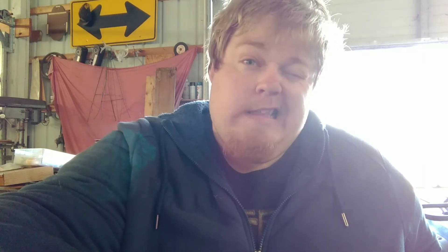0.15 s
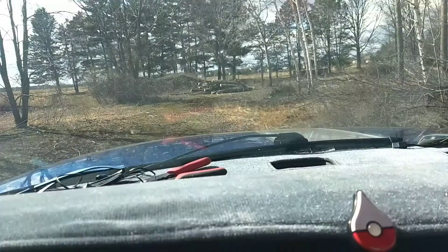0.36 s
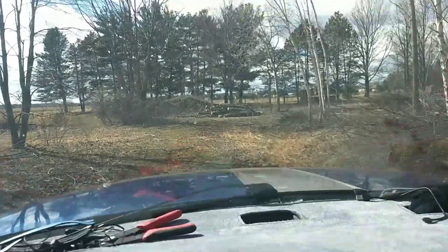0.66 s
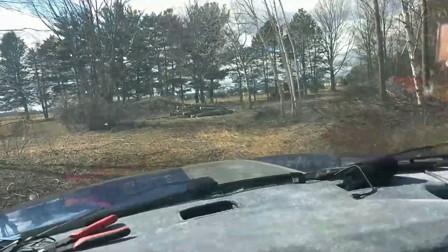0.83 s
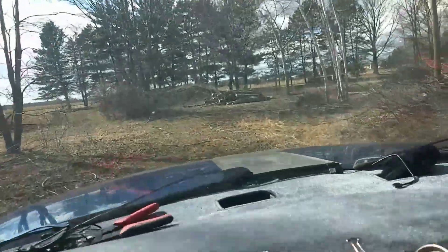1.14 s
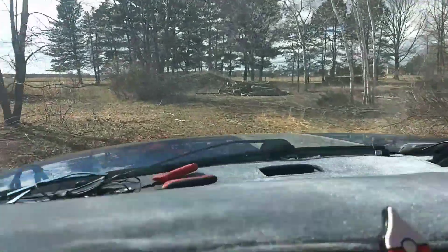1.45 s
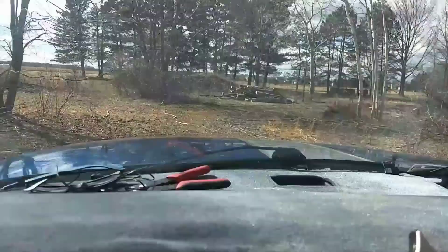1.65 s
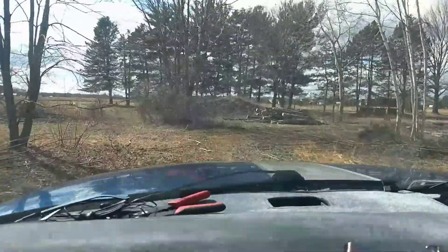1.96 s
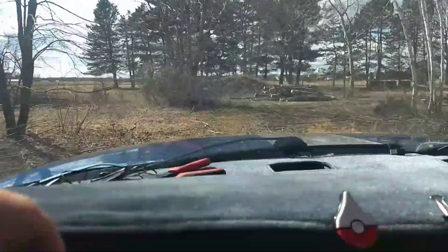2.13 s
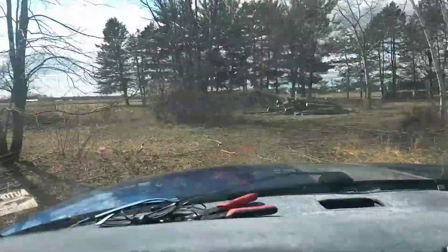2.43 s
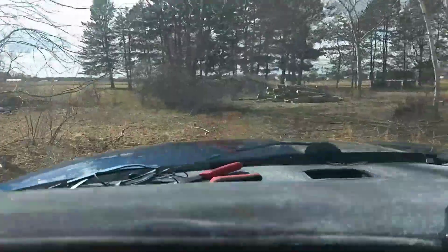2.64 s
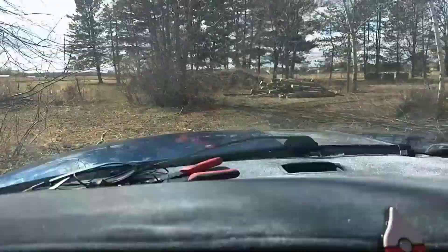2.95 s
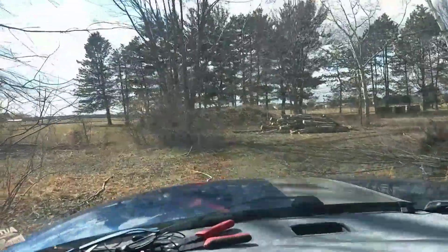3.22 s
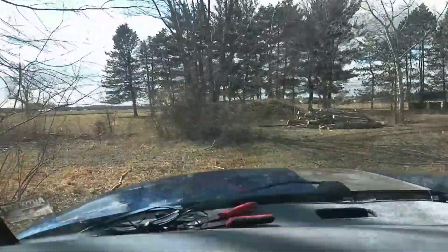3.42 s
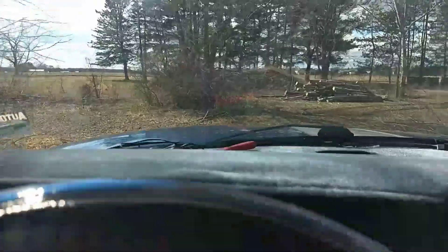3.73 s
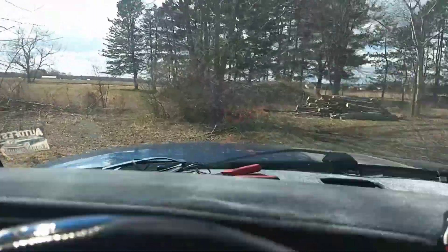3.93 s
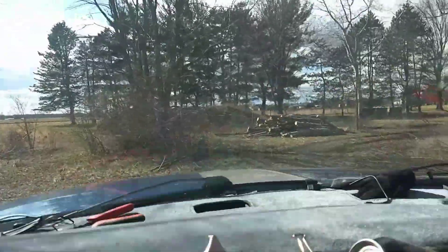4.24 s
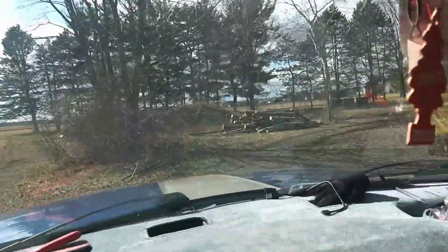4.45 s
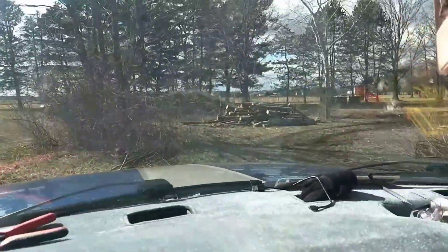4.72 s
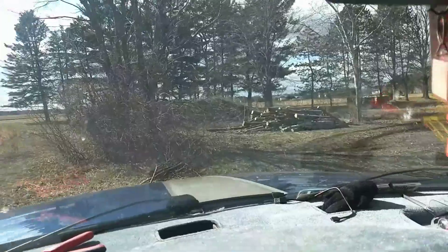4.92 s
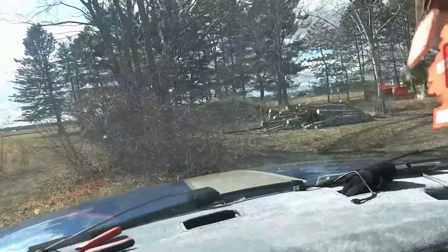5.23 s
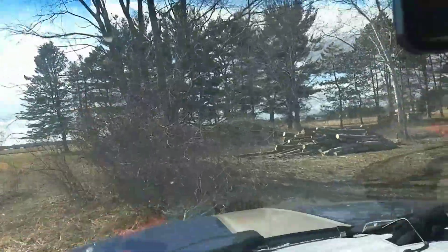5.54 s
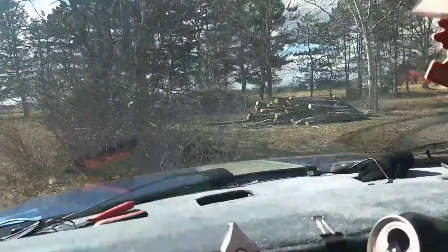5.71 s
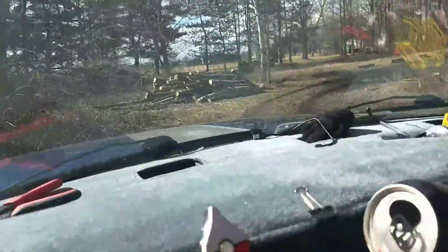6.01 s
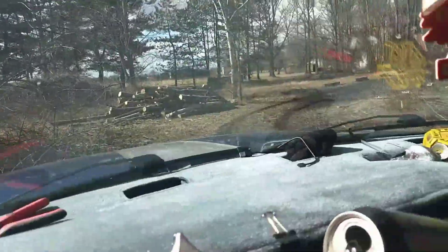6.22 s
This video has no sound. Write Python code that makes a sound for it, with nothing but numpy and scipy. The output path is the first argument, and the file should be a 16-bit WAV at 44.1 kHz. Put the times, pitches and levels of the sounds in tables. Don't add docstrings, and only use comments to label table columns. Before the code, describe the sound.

A latch clack and finger tap in a quiet shed, then a droning pickup cab with thudding bumps, rattling trim and clacking tools.

```python
import sys
import numpy as np
from scipy import signal
from scipy.fft import rfft, irfft, next_fast_len
from scipy.io import wavfile
from scipy.ndimage import uniform_filter1d

SR = 44100
rng = np.random.default_rng(int(sys.argv[2]) if len(sys.argv) > 2 else 0)


def log_audio(samples):
    frames = np.atleast_2d(samples).T
    limited = np.clip(frames, -1, 1)
    pcm = np.round(limited * 32767).astype(np.int16)
    wavfile.write(sys.argv[1], SR, pcm)


def magnitude_from_level(level_db):
    exponent = np.asarray(level_db, float) / 20
    return 10 ** exponent


N = 280917

# multiple, level_db, left_minus_right_db, left_lead_rad
ENGINE_TONES = [(1, 0, -2, -.08), (2, .5, 5.5, -1.13), (3, -10, -13, -2.54), (4, -15, 0, -1),
                (5, -20, -15.5, 1), (6, -20, 0, -1)]
# time_s, rate_hz
FIRING_RATE = [(.3, 51.25), (2.4, 51.4), (3.3, 51.4), (4.4, 51.35), (4.9, 50.4), (5.3, 50.0), (5.7, 50.6),
               (6.4, 50.6)]
# time_s, phone_gain_db, engine_load_db
RIDE = [(.32, -11.5, -1), (.45, -5.5, -0.5), (.6, -6.5, -1), (1.0, -1.5, -1.5), (1.35, -1, -1),
        (1.6, 0, 0.5), (2.2, -1, 0.5), (2.5, -1.5, 1.5), (2.65, -5, 3), (3.1, -1.5, -1.5), (3.5, 0.5, 0.5),
        (4.0, -1, 1), (4.4, 0.5, 0), (4.9, -1.5, -0.5), (5.3, -1, -0.5), (5.65, 0.5, -0.5), (6.15, -1.5, 1),
        (6.37, 0.5, -0.5)]
# time_s, roughness_db
TRAIL = [(.32, -3), (.6, -2), (.92, 7.5), (1.1, -4), (1.58, 2), (1.75, -9), (1.9, 5), (2.12, -9),
         (2.35, -4), (2.6, -1), (3.2, -17), (3.5, 0), (3.9, -5), (4.62, 2.5), (4.85, -2), (5.5, 1.5),
         (6.1, -6), (6.37, -8)]
# time_s, pressure_db
GEAR_PRESSURE = [(.33, -15), (.8, -4.5), (1.25, 3), (1.5, 7), (1.85, -4.5), (2.05, 3.5), (2.4, -0.5),
                 (2.87, 11), (3.0, 0), (3.3, -4), (3.55, 7), (4.0, 4), (4.3, 5), (4.85, -16), (5.4, -13),
                 (5.75, -2), (5.97, 8), (6.37, 1)]
# pitch_hz, level_db (per Hz)
ROAR_COLOUR = [(35, -37), (70, 2), (130, 7.5), (205, 9.5), (245, 4.5), (320, 4), (520, -2.5), (1000, -2),
               (1800, -7)]
# pitch_hz, level_db (per Hz)
CHATTER_COLOUR = [(1500, -4), (2700, 3), (3400, -13), (5200, -13.5), (6200, -37), (7000, -26), (8500, -86)]
# pitch_hz, level_db (per Hz)
HISS_COLOUR = [(6000, -4), (8500, -20), (10800, -10), (12300, -1.5), (13200, 2), (14500, 0.5), (15750, -7),
               (15850, -40)]
# pitch_hz, width_hz, level_db
PANELS = [(428, 40, -4), (619, 26, -3), (750, 22, 0), (800, 40, -2), (1004, 24, 0), (1200, 50, -7),
          (1414, 45, -7)]
# pitch_hz, level_db, fade_60db_s
TRIM = [(2380, 0.5, 0.056), (2915, -1.5, 0.041), (3335, -9, 0.019), (4650, -18, 0.005)]
# start_s, peak_db, floor_pitch_hz, left_minus_right_db
BUMPS = [(.593, -22.5, 175, 1.5), (.77, -23, 154, 4), (.817, -18.5, 163, -4), (1.002, -21, 190, 2),
         (1.191, -13, 169, 0), (1.311, -19, 161, 0), (1.367, -13, 174, 0), (1.624, -15.5, 188, 1.5),
         (2.0, -15, 174, 4), (2.184, -11, 172, 0), (2.288, -15, 162, 2), (2.95, -29, 181, 1),
         (3.45, -20, 137, -4.5), (3.536, -21, 165, 0), (3.68, -14.5, 168, 6), (3.8, -16.5, 152, 1),
         (4.171, -25, 155, -1), (4.272, -26, 215, -3), (4.5, -21.5, 145, -7), (4.638, -24, 159, -2.5),
         (4.694, -15.5, 183, -2.5), (4.74, -14, 167, -.5), (4.793, -13, 176, 3), (5.168, -16, 148, 6),
         (5.396, -15, 170, 2), (5.539, -21.5, 194, 1.5), (5.75, -17, 172, 2), (5.861, -21.5, 196, 6),
         (6.021, -21, 186, 5), (6.07, -16, 164, 8)]
LIGHT_BUMPS = [1.043, 1.793, 1.911, 2.049, 2.696, 3.391, 4.034, 4.599, 5.075, 5.212, 5.316, 5.911, 6.246]
# start_s, peak_db, dull_part_db, bright_part_db
CLACKS = [(.4577, -23, 1, 0), (.497, -34, -11, -24), (.591, -32, -1, -9), (.903, -31.5, -10, -12),
          (.9657, -21, -31, -7), (1.189, -29.5, 13.5, 1.5), (1.307, -34, -5, -10), (1.5828, -27, -15, -15),
          (1.8323, -33, -1, -1), (2.0652, -28.5, -17, -28), (2.3218, -22.5, -28, 2),
          (2.5501, -13.5, 0.5, -8), (2.844, -37, -6, 1), (2.912, -14.5, -3, -7), (3.3096, -15.5, -2, -9),
          (3.3744, -34, -8, 4), (3.6187, -35, -9, -19), (3.9215, -30, -18, -8), (3.953, -24, -19, -9.5),
          (4.145, -30.5, -15, -21), (4.34, -22, -26.5, -18), (4.556, -21.5, -26, -19),
          (4.8269, -20.5, -15, -20), (4.8638, -29, -17, -16), (5.146, -37, -3, 1), (5.345, -29.5, -17, -3),
          (5.424, -31, -16, -20), (5.5298, -35, -10, -3), (5.8491, -27, -22, -2.5), (6.3545, -32, -6, -21)]
LIGHT_CLACKS = [.43, .617, .7437, 1.4167, 1.8994, 2.21, 2.854, 3.362, 3.708, 3.786, 4.31, 5.0973, 5.288]
# start_s, level_db
KEY_HITS = [
    (.459, -46),
    (2.9135, -39),
    (3.954, -52),
]
# level_db, fade_60db_s
KEY_RINGS = [(-8, .15), (0, .17), (-3, .12), (-6, .08), (-14, .12)]
KEY_PITCHES = [9150, 10990, 11490, 12830, 7640]
# start_s, from_hz, to_hz, length_s, level_db
SQUEAKS = [
    (5.661, 2340, 2920, 0.0061, -14),
    (5.676, 2500, 2900, .006, -21),
    (5.692, 2850, 2900, 0.0065, -28),
    (4.3, 2800, 2900, .012, -23),
]
# pitch_hz, side_minus_mid_db
BASS_SIDE = [(40, -10), (90, -6), (300, -0.5), (480, -6), (650, -9.5), (1075, -13.5)]
# start_s, level_db
LATCH_HITS = [
    (.0002, -31),
    (.0026, -21),
]
# pitch_hz, level_db, fade_60db_s
LATCH_RINGS = [(650, -14, .03), (1500, -6, .006), (2200, -4, .01), (2800, 3, .008), (3300, 3, .01),
               (4800, -14, .004), (5900, -15, .012), (7200, -16, .006), (13500, -11, .004)]
# start_s, tick_db, thump_db
TAPS = [
    (.2169, -27, -31),
    (.2273, -8, -17),
]
# pitch_hz, level_db, fade_60db_s
CASE_RINGS = [(950, 4, .0045), (2700, -1, .0025), (5200, 0, .0018), (8000, -6, .0012)]
# pitch_hz, level_db (per Hz)
SHED_AIR = [(60, 13), (300, 0), (1500, 0), (2600, 1), (4500, -16), (6000, -8.5), (9000, -32), (14000, -19)]
# pitch_hz, level_db
PHONE_TOP = [(15750, 0), (15830, -22), (16400, -26), (16600, -60)]

T = np.arange(N) / SR
SIZE = next_fast_len(N)
F = np.maximum(np.arange(SIZE // 2 + 1) * SR / SIZE, 1)
HALF = np.array([[.5], [-.5]])


def unit(x):
    return x / np.sqrt(np.mean(x ** 2))


def curves(table):
    times, *columns = np.transpose(table)
    return [np.interp(T, times, column) for column in columns]


def shape(points):
    hz, db = np.transpose(points)
    return np.interp(np.log(F), np.log(hz), db)


def filter_by(x, gain):
    return irfft(rfft(x, SIZE) * gain, SIZE)[..., :N]


def colour(x, points):
    below = (points[0][0] / 2, points[0][1] - 30)
    above = (points[-1][0] * 2, points[-1][1] - 30)
    return filter_by(x, magnitude_from_level(shape([below] + list(points) + [above])))


def band(x, low_hz, high_hz):
    return signal.sosfilt(signal.butter(2, [low_hz, high_hz], "band", fs=SR, output="sos"), x)


def walk(rate_hz):
    hold = int(SR / rate_hz)
    steps = np.repeat(rng.standard_normal(N // hold + 1), hold)
    return unit(uniform_filter1d(uniform_filter1d(steps, hold), hold)[:N])


def ring(x, hz, fade_s):
    decay = np.exp(-np.log(1000) / (fade_s * SR))
    turn = 2 * np.pi * hz / SR
    return signal.lfilter([0, np.sin(turn)], [1, -2 * decay * np.cos(turn), decay * decay], x)


def ring_all(x, rings):
    return sum(magnitude_from_level(db) * ring(x, hz, fade_s) for hz, db, fade_s in rings)


def add(out, start_s, sound):
    i = max(int(start_s * SR), 0)
    out[..., i:i + sound.shape[-1]] += sound[..., :N - i]


def blows(hits):
    x = np.zeros(N)
    for start_s, db in hits:
        add(x, start_s, np.array([magnitude_from_level(db)]))
    return x


def ports(common, spread, boomy):
    lag_s = 20 / SR
    late = magnitude_from_level(-3) * np.exp(-2j * np.pi * np.minimum(F, 14800) * lag_s)
    mid_gain, side_gain = (1 - late) / 2, -(1 + late) / 2
    if boomy:
        low, ratio = F < .5 / lag_s, magnitude_from_level(shape(BASS_SIDE))
        total = np.sqrt(1 + ratio ** 2)
        mid_gain = np.where(low, 1 / total, mid_gain)
        side_gain = np.where(low, -1j * ratio / total, side_gain)
    mid, side = filter_by(common, mid_gain), filter_by(spread, side_gain)
    return np.array([mid + side, mid - side])


def engine():
    (rate_hz,), (gain_db, load_db) = curves(FIRING_RATE), curves(RIDE)
    phase = 2 * np.pi * np.cumsum(rate_hz * (1 + 0.0037 * walk(14))) / SR
    surge_db = 1.05
    first_db = -33.5 + gain_db + .7 * load_db + surge_db * walk(6)
    higher_db = -28.5 + gain_db + load_db + surge_db * walk(8.3)
    drone = 0
    for multiple, db, pan_db, lead in ENGINE_TONES:
        multiple = round(multiple)
        level_db = (first_db if multiple == 1 else higher_db) + db + 0.54 * multiple * walk(12)
        tone = np.sin(multiple * phase + HALF * lead)
        drone = drone + np.sqrt(2) * magnitude_from_level(level_db + HALF * pan_db) * tone
    return drone, phase


def body_roar(beat):
    roar = colour(rng.standard_normal((2, N)) * beat * magnitude_from_level(1.25 * walk(20)), ROAR_COLOUR)
    return roar / np.std(band(roar, 276.0, 1940.0))


def panel_buzz(beat):
    shake = rng.standard_normal((2, N)) * beat
    buzz = 0
    for hz, width_hz, db in PANELS:
        buzz = buzz + magnitude_from_level(db + 2.0 * walk(6)) * unit(ring(shake, hz, 4.6 / width_hz))
    return unit(buzz)


def rattle_grit():
    ticks = rng.random(N) * (rng.random(N) < 80 / SR)
    return 1 + 0.43 * signal.lfilter([1], [1, -np.exp(-1 / (0.011 * SR))], ticks)


def trim_chatter(beat, grit):
    shake = rng.standard_normal((2, N)) * beat * grit * magnitude_from_level(1.86 * walk(18))
    chatter = unit(colour(shake, CHATTER_COLOUR))
    ticking = 0
    for hz, db, fade_s in TRIM:
        ticks = rng.standard_normal(N) * (rng.random(N) < 45 / SR)
        ticking = ticking + magnitude_from_level(db) * ring(ticks, hz, fade_s)
    return chatter + magnitude_from_level(-4.5) * unit(ticking)


def vent_hiss(grit):
    noise = rng.standard_normal((2, N))
    return unit(colour(noise * grit ** 2.1 * magnitude_from_level(0.4 * walk(5.6)), HISS_COLOUR))


def gear_whine(beat, level_db):
    hz = 15.5 * curves(FIRING_RATE)[0]
    phase = 2 * np.pi * np.cumsum(hz * (1 + 0.00733 * walk(25.01))) / SR
    return magnitude_from_level(level_db + 3.5 * walk(35)) * beat * np.sin(phase)


def cab(phase):
    gain_db, (rough_db,), (mesh_db,) = curves(RIDE)[0], curves(TRAIL), curves(GEAR_PRESSURE)
    beat = 1 + .2 * np.cos(phase) + .07 * np.cos(2 * phase)
    grit = rattle_grit()
    shaking = magnitude_from_level(-29.5 + gain_db) * body_roar(beat)
    shaking = shaking + magnitude_from_level(-34 + gain_db + 0.13 * mesh_db) * panel_buzz(beat)
    shaking = shaking + magnitude_from_level(-34 + gain_db + 0.12 * rough_db) * trim_chatter(beat, grit)
    shaking = shaking + magnitude_from_level(-52.5 + gain_db + rough_db) * vent_hiss(grit)
    common, other = shaking
    alike = 0.4
    spread = alike * common + np.sqrt(1 - alike ** 2) * other
    return ports(common, spread, True) + gear_whine(beat, -37 + gain_db + mesh_db)


def bumps():
    out, t = np.zeros((2, N)), T[:4000]
    swell = t / .0055 * np.exp(1 - t / .0055)
    for start_s, db, hz, pan_db in BUMPS + [(s, -25, 172, 0) for s in LIGHT_BUMPS]:
        lead = .8 * rng.standard_normal()
        thud = swell * np.sin(2 * np.pi * hz * t + HALF * lead)
        add(out, start_s, magnitude_from_level(db - 2.0 + HALF * pan_db) * thud)
    return out


def clacks():
    out, t = np.zeros(N), T[:5000]
    chatter_s = 0.0085
    for start_s, db, dull_db, bright_db in CLACKS + [(s, -35.5, -11, -9) for s in LIGHT_CLACKS]:
        bounce = unit(uniform_filter1d(rng.standard_normal(len(t)), 50))
        chatter = magnitude_from_level(0.83 * bounce) / (1 + (t / chatter_s) ** 4)
        strike, cab_tail = 1.3 * np.exp(-t / 0.0012), 0.58 * np.exp(-t / 0.017)
        burst = rng.standard_normal(len(t)) * (chatter + strike + cab_tail)
        burst[20] = 14.3
        dull = band(burst, 430.0, 2630.0)
        middle = band(band(burst, 2580.0, 5050.0), 2500.0, 5530.0)
        bright = band(burst, 11200.0, 17100.0)
        clack = magnitude_from_level(dull_db) * dull / np.abs(dull).max()
        clack = clack + middle / np.abs(middle).max()
        clack = clack + magnitude_from_level(bright_db + 2) * bright / np.abs(bright).max()
        add(out, start_s - .0005, magnitude_from_level(db + 4.5) * clack)
    keys = [(hz, db, fade_s) for hz, (db, fade_s) in zip(KEY_PITCHES, KEY_RINGS)]
    out = out + ring_all(blows(KEY_HITS), keys)
    return ports(out, out, True)


def squeak():
    out = np.zeros(N)
    for start_s, from_hz, to_hz, length_s, db in SQUEAKS:
        size = int(length_s * SR)
        rough = unit(uniform_filter1d(rng.standard_normal(8000), 20))[:size]
        hz = np.linspace(from_hz, to_hz, size) * (1 + 0.081 * rough)
        chirp = np.hanning(size) * np.sin(2 * np.pi * np.cumsum(hz) / SR)
        add(out, start_s, magnitude_from_level(db) * chirp)
    return ports(out, out, True)


def latch_clack():
    scrape = rng.standard_normal(400) * np.exp(-T[:400] / 0.0019) / 4
    return ring_all(np.convolve(blows(LATCH_HITS), scrape)[:N], LATCH_RINGS)


def finger_taps():
    tick = ring_all(blows([(s, db) for s, db, _ in TAPS]), CASE_RINGS)
    thump = ring(blows([(s + .002, db) for s, _, db in TAPS]), 145., .065)
    return tick + thump


def shed_air():
    after = T - TAPS[-1][0]
    air_db = -51 - 31 * np.exp(-np.abs(after) / 0.04) * (after > 0)
    echo_db = -31.5 - 60 * T / 0.13
    noise = rng.standard_normal((2, N)) * [[1], [.45]]
    return (magnitude_from_level(air_db) + magnitude_from_level(echo_db)) * unit(colour(noise, SHED_AIR))


def shed():
    common, spread = shed_air()
    middle = common + latch_clack() + finger_taps()
    fade = np.clip((0.288 - T) / 0.004, 0, 1)
    return ports(middle + spread, middle - spread, False) * fade


def scene():
    drone, phase = engine()
    cab_start_s = .3155
    opening = np.clip(.75 + (T - cab_start_s) / .04, 0, 1) * (T > cab_start_s)
    return (drone + cab(phase) + bumps() + clacks() + squeak()) * opening + shed()


def top_cut(x):
    return signal.sosfilt(signal.butter(12, 16510, fs=SR, output="sos"), x)


def record(dry):
    mix = filter_by(dry, magnitude_from_level(shape(PHONE_TOP)))
    return top_cut(mix)


dry = scene()
out = record(dry)
log_audio(out)
```